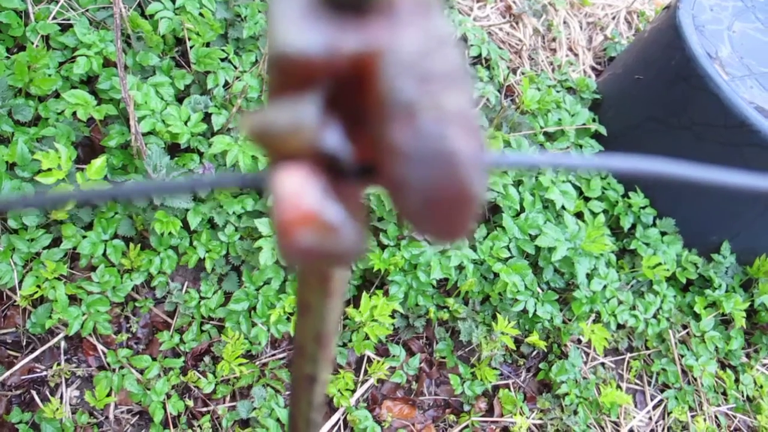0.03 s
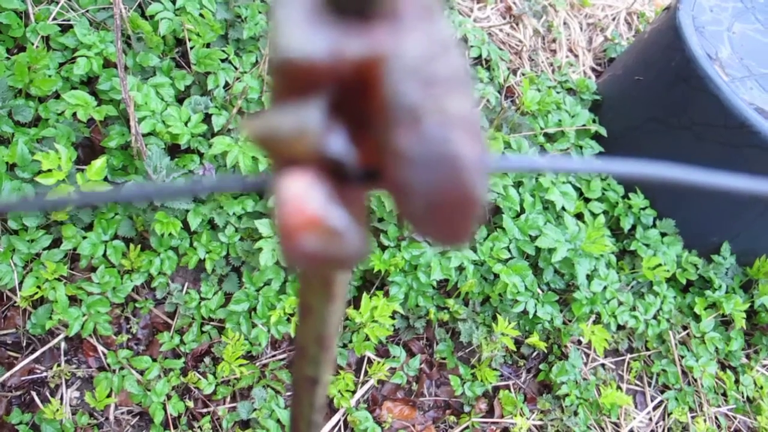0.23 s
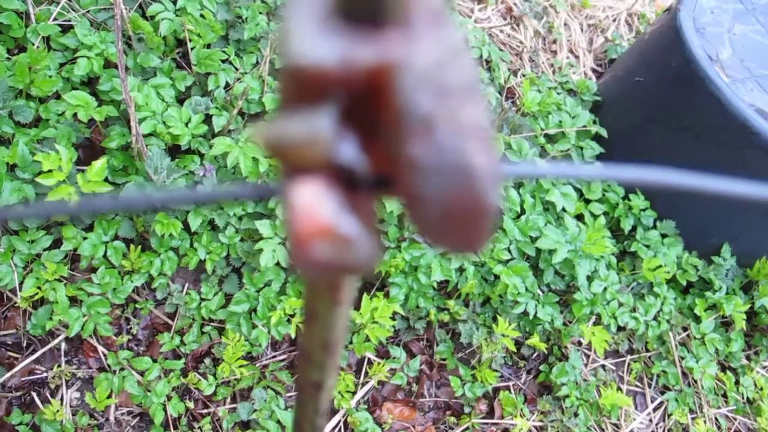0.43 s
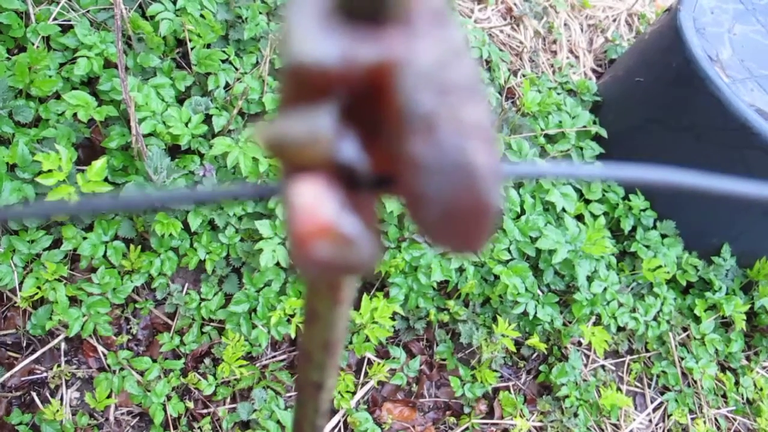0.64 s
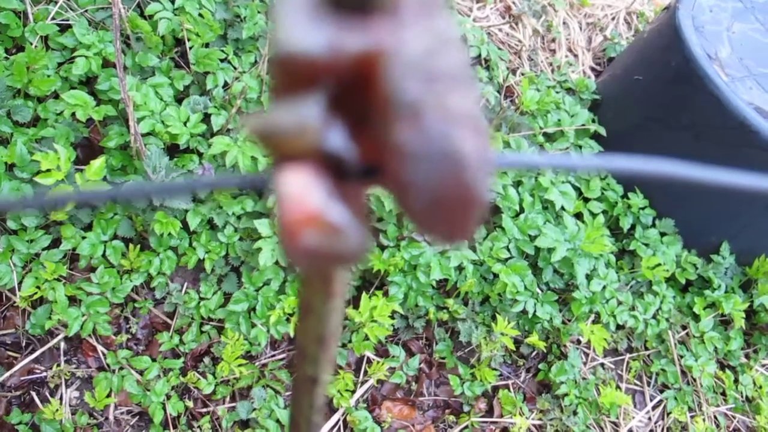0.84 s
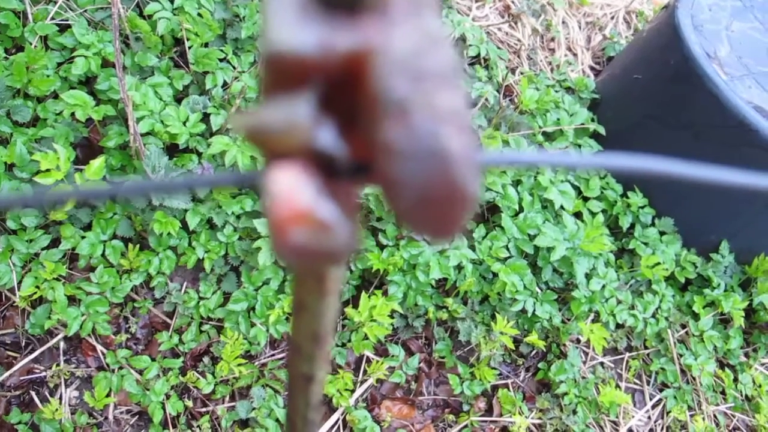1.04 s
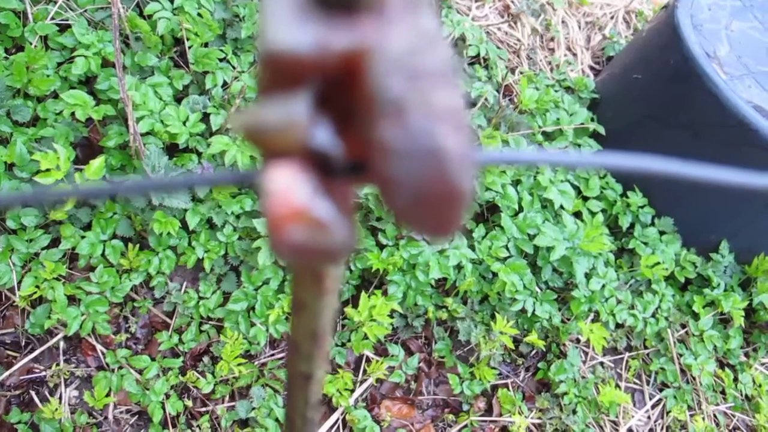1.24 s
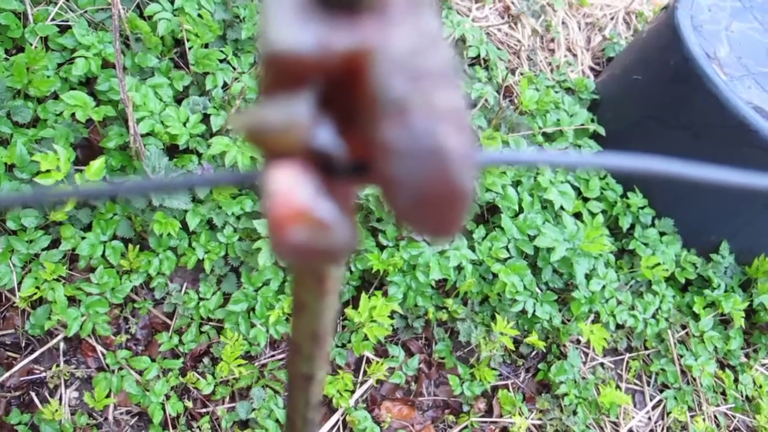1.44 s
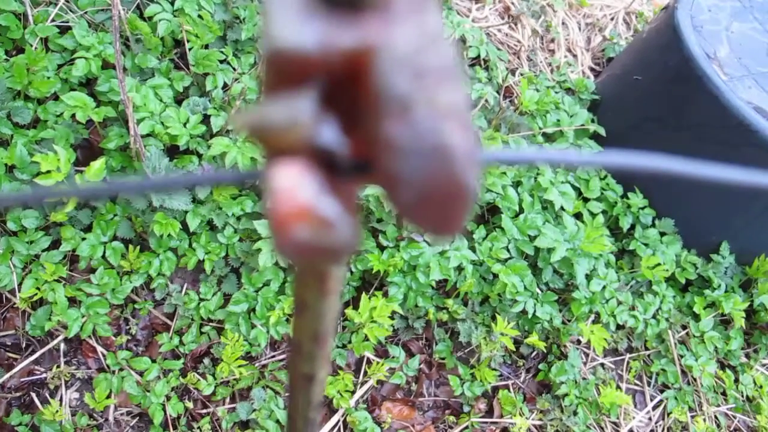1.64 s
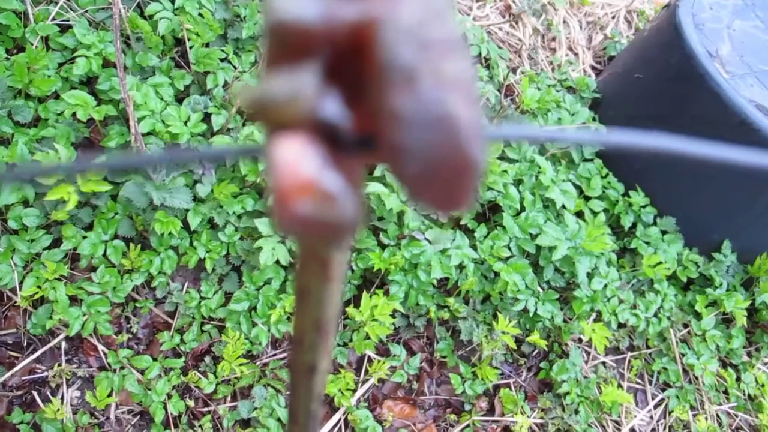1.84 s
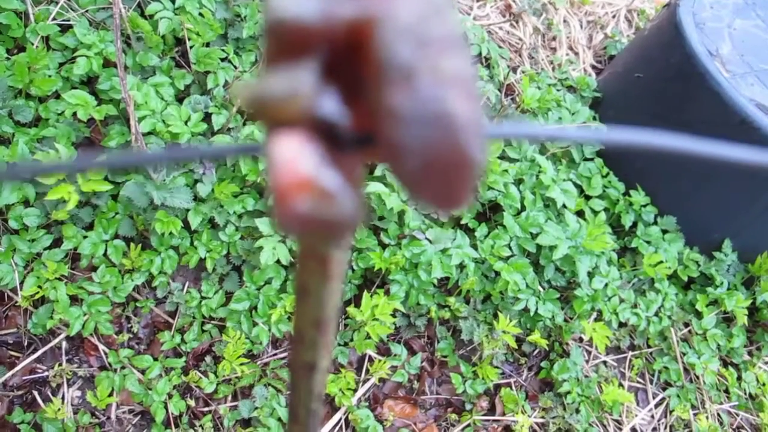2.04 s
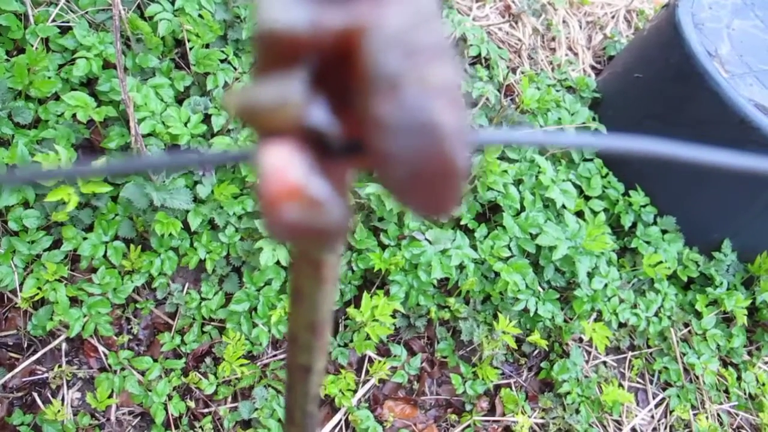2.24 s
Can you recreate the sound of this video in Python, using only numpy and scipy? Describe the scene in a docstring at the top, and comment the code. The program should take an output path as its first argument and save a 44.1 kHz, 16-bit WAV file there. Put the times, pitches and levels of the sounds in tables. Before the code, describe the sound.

An electric fence sparks with two sharp snaps while birds chirp faintly.

```python
"""A wooded garden, the microphone a hand's length from an insulator of an electric fence.
A near bird whistles rising calls over a faint outdoor rush. At 0.25 s a spark snaps: it rings and
overloads the microphone, bounces off the ground and scatters in the foliage; the gain control ducks
and creeps back. Distant song, a faint tick and a soft bump of handling follow. At 1.43 s the fence
sparks again, then come falling chips, a far trill and more song from the trees."""
import sys
import numpy as np
from scipy import signal
from scipy.fft import rfft, irfft
from scipy.io import wavfile
from scipy.ndimage import uniform_filter1d

SR = 44100
rng = np.random.default_rng(int(sys.argv[2]) if len(sys.argv) > 2 else 0)


def generate_wav(signal):
    """Clip the signal to [-1, 1] and save it as 16-bit WAV at the path in sys.argv[1]."""
    frames = np.transpose(np.atleast_2d(signal))
    scaled = np.clip(frames, -1, 1) * 32767
    pcm = np.round(scaled).astype(np.int16)
    wavfile.write(sys.argv[1], SR, pcm)


N = 105840

# sparks, their rebound off the insulator and the overload they leave (signed pressure):
# start_s, level_db, pulse_ms, rebound_ms, rebound_db, left_offset, right_offset
SPARKS = [(0.2482, 28, 0.18, .29, -14, -0.94, -.1), (1.4278, 28.5, 0.093, 0.082, -11.5, -0.67, 0.072)]
# resonances of the microphone housing: pitch_hz, width_hz, left_db, right_db
HOUSING_MODES = [(653, 680, -8.5, -17), (1439, 630, -3, -18), (2360, 810, -0.5, -12), (3232, 280, -5.5, -6),
                 (5300, 240, 1, -16), (7100, 1100, -0.5, -1.5), (7250, 600, -18, 3),
                 (9180, 590, -18.5, -10), (10800, 760, -11.5, -10), (15050, 1600, -6.5, -8.5)]
# echoes off post, ground, plants and far objects: delay_s, spread_s, left_db, right_db
ECHOES = [(.0021, .0004, -24, -24.5), (.006, 0.0003, -28.5, -13.5), (.009, .0018, -23, -21),
          (.059, .0006, -40, -44.5), (.086, .001, -45, -47.5)]
# colour of those echoes: frequency_hz, level_db
ECHO_COLOUR = [(150, -32.5), (600, -21), (2300, -15), (4500, -22), (6000, -6), (7000, -4), (9000, -11),
               (12000, -19.5), (16000, -34.5)]
# scatter from near and far foliage: t60_s, left_db, right_db
LEAF_SCATTER = [(.06, -31, -30), (0.322, -40, -28)]
# colour of that scatter: frequency_hz, level_db
LEAF_COLOUR = [(200, -34.5), (1800, -15.5), (4200, -13.5), (6000, -5), (7500, -1.5), (10500, -11),
               (13000, -22.5), (16000, -34.5)]
# rising calls of the near bird: start_s, level_db
NEAR_CALLS = [(-.1, -35.5), (.029, -39), (0.161, -40)]
# distant song: start_s, length_s, from_hz, to_hz, bend (under 1 glides early), level_db
SONG_NOTES = [(.38, 0.041, 6500, 5400, 0.43, -54), (.41, 0.028, 4620, 3700, 0.46, -59.5),
              (.694, 0.016, 6890, 4320, 0.64, -54), (.704, 0.028, 4400, 4040, 0.72, -50),
              (1.034, 0.039, 7350, 5185, 0.3, -52), (1.052, 0.025, 6220, 5100, 1.0, -54.5),
              (1.064, 0.037, 5000, 3500, 0.44, -58), (1.495, 0.096, 2970, 4335, 1.3, -55),
              (2.21, .07, 5415, 5200, 1.0, -62.5), (2.255, 0.051, 4430, 4450, 0.85, -60.5),
              (2.32, 0.038, 5030, 5550, 1.36, -56), (2.35, 0.053, 4740, 4500, 0.67, -55.5),
              (2.37, 0.037, 5430, 5250, 1.3, -56.5)]
# a run of falling chips: start_s, level_db
CHIPS = [(1.683, -57), (1.751, -57), (1.821, -57), (1.893, -53), (1.97, -53), (2.041, -54), (2.123, -56)]
# handling noises at the microphone: start_s, length_s, centre_hz, width_hz, level_db
HANDLING = [(0.626, 0.012, 2540, 2600, -56), (1.066, 0.029, 136, 68.6, -49)]
# spectrum of the outdoor rush: frequency_hz, density_db
AIR_COLOUR = [(15, -29.5), (25, -3), (74, 3), (123, -7), (293, -15), (373, -16.5), (607, -11.5),
              (1190, -14.5), (1940, -21.5), (2610, -20.5), (2990, -21.5), (5430, -24), (6560, -25.5),
              (14000, -32.5), (16000, -49)]
# share of the rush that differs between left and right: frequency_hz, side_db
AIR_SIDE = [(50, -16.5), (200, -5), (900, -6.5), (4000, 0.5), (12000, -1)]


def fence():
    """One snap for each pulse of the fence; the overloaded microphone settles with a small thump."""
    out = np.zeros((2, LEAD + N))
    thump_s = .0009
    settle = np.exp(-np.arange(SR // 20) / SR / thump_s)
    for start, db, pulse_ms, rebound_ms, rebound_db, left, right in SPARKS:
        add(out, start, undb(db) * spark(pulse_ms, rebound_ms, rebound_db))
        add(out, start, np.array([[left], [right]]) * settle)
        add(out, start, undb(db) * garden_reflections())
    return out[:, LEAD:]


def spark(pulse_ms, rebound_ms, rebound_db):
    """A pressure pulse and its rebound off the insulator, heard through the ringing housing."""
    size = 4096
    t, hz = np.arange(size) / SR, np.fft.rfftfreq(size, 1 / SR)
    age = t * 1000 / pulse_ms
    pulse = -np.exp(-2 * age) * (1 - age)
    rebound = 1 + undb(rebound_db) * np.exp(-2j * np.pi * hz * rebound_ms / 1000)
    crack = irfft(rfft(pulse) * rebound)[:size // 2]
    power = undb(-13.5) ** 2  # flat floor under the resonances
    for pitch, width, left, right in HOUSING_MODES:
        resonance = (width * hz) ** 2 / ((width * hz) ** 2 + (pitch ** 2 - hz ** 2) ** 2)
        power = power + undb([[left], [right]]) ** 2 * resonance
    ring = causal(2 * np.sqrt(power))
    return signal.fftconvolve(crack[None], ring, axes=1)


def garden_reflections():
    """What comes back of a snap: a few echoes and a hiss of reflections from leaves."""
    t = np.arange(SR // 2) / SR
    echoes = leaves = 0
    for delay, spread, left, right in ECHOES:
        age = np.maximum(t - delay + spread, 0) / spread
        burst = rng.standard_normal((2, len(t))) * age ** 2 * np.exp(-2 * age)
        echoes += undb([[left], [right]]) * unit(colour(burst, ECHO_COLOUR))
    ground_delay_s = ECHOES[1][0]
    arrived = np.clip(t / ground_delay_s - 1, 0, 1)
    for t60, left, right in LEAF_SCATTER:
        hiss = rng.standard_normal((2, len(t))) * arrived * decay(t, t60)
        leaves += undb([[left], [right]]) * unit(hiss)
    return echoes + colour(leaves, LEAF_COLOUR)


def birds():
    """A near caller, distant song, chips and a far trill that is mostly reverberation."""
    # rows laid out like SONG_NOTES
    calls = [(start, .048, 4150, 7143, 2.2, db) for start, db in NEAR_CALLS]
    chips = [(start, .02, 3750, 2450, 1, db) for start, db in CHIPS]
    step_s, fall_db_per_s = .074, 1
    trill = [(1.835 + s, .065, 6400, 3840, .5, -71.5 - fall_db_per_s * s) for s in step_s * np.arange(8)]
    chorus = (among_trees(whistles(calls, rough=.014), wet_db=7.5)
              + among_trees(whistles(SONG_NOTES, rough=.022), wet_db=5)
              + among_trees(whistles(chips, rough=.015), wet_db=-4)
              + among_trees(whistles(trill, rough=.0994), wet_db=21))
    return chorus[:, LEAD:] * undb([[1], [-1]])  # a little left of the microphone


def whistles(notes, rough):
    """A bird's gliding notes; the pitch wavers by the fraction rough."""
    out = np.zeros(LEAD + N)
    for start, length, from_hz, to_hz, bend, db in notes:
        progress = np.linspace(0, 1, int(length * SR))
        glide = progress ** bend if bend >= 1 else 1 - (1 - progress) ** (1 / bend)
        waver = uniform_filter1d(rng.standard_normal(SR // 4), size=64)[:len(progress)] * np.sqrt(64)
        hz = (from_hz + (to_hz - from_hz) * glide) * (1 + rough * waver)
        tone = np.sin(2 * np.pi * np.cumsum(hz) / SR)
        add(out, start, undb(db) * np.sin(np.pi * progress) * tone)
    return out


def among_trees(direct, wet_db):
    """The trees add a long tail and a short, stronger scatter to the direct sound."""
    t = np.arange(SR) / SR
    tail = decay(t, t60_s=1) + undb(3.5) * decay(t, t60_s=.15)
    trees = unit(rng.standard_normal((2, SR)) * tail)
    wet = signal.fftconvolve(direct[None], trees, axes=1)[:, :len(direct)]
    return direct + undb(wet_db) * wet


def handling():
    """A faint tick and a soft low bump close to the microphone."""
    out = np.zeros(LEAD + N)
    hz = np.fft.rfftfreq(SR, 1 / SR)
    for start, length, centre, width, db in HANDLING:
        passband = np.exp(-2 * ((hz - centre) / width) ** 2)
        noise = irfft(rfft(rng.standard_normal(SR)) * passband, SR)
        swell = np.hanning(int(length * SR))
        add(out, start, undb(db) * swell * noise[:len(swell)] / np.std(noise))
    return out[LEAD:]


def air(mid_db=-57.5):
    """Faint outdoor rush, its rumble near the centre and its treble wide."""
    hz = np.fft.rfftfreq(N, 1 / SR)
    mid, side = rfft(rng.standard_normal((2, N))) * curve(AIR_COLOUR, hz)
    mid, side = irfft(mid, N), irfft(side * curve(AIR_SIDE, hz), N)
    return np.array([mid + side, mid - side]) * undb(mid_db) / np.std(mid)


def add(out, start_s, x):
    """Mix x into a track that begins LEAD samples before time zero."""
    i = max(LEAD + int(round(start_s * SR)), 0)
    part = x[..., :max(out.shape[-1] - i, 0)]
    out[..., i:i + part.shape[-1]] += part


def undb(db):
    """Decibels to gain."""
    return 10 ** (np.asarray(db) / 20)


def decay(t, t60_s):
    """An envelope that falls 60 dB in t60_s."""
    return np.exp(-np.log(1000) * t / t60_s)


def unit(x):
    """Scale each channel to unit energy."""
    return x / np.sqrt(np.sum(x ** 2, axis=-1, keepdims=True))


def curve(points, hz):
    """Gain at hz from (frequency_hz, level_db) points."""
    point_hz, point_db = np.array(points, float).T
    return undb(np.interp(np.log(hz + 1), np.log(point_hz), point_db))


def colour(x, points):
    """Pass x through a causal, unit-energy filter of the given colour."""
    response = causal(curve(points, np.fft.rfftfreq(2048, 1 / SR)))
    return signal.fftconvolve(x, unit(response)[None], axes=1)[:, :x.shape[1]]


def causal(gain):
    """Shortest causal response with the given gains."""
    cepstrum = irfft(np.log(gain))
    half = cepstrum.shape[-1] // 2
    cepstrum[..., 1:half] *= 2
    cepstrum[..., half + 1:] = 0
    return irfft(np.exp(rfft(cepstrum)))[..., :half]


LEAD = SR // 4  # samples of run-up, so an earlier call can still be ringing at time zero


def scene():
    """The garden at the microphone: fence, birds, outdoor air and handling."""
    return fence() + birds() + air() + handling()


def record(dry):
    """The recorder's gain control ducks on loud peaks, holds and creeps back; the snaps still overload."""
    threshold_db, max_duck_db, hold_s, recover_s = -14, 13, .04, .46
    ceiling, top_hz = .8, 16000
    peak_db = 20 * np.log10(np.abs(dry).max(axis=0) + 1e-9)
    over_db = np.clip(peak_db - threshold_db, 0, max_duck_db)
    fade = np.exp(-np.arange(N) / SR / recover_s)
    recovering_db = np.maximum.accumulate(over_db / fade) * fade
    duck_db = np.minimum(recovering_db * np.exp(hold_s / recover_s), max_duck_db)  # the cap is the hold
    ducked = dry * undb(-duck_db)
    clipped = ducked / np.sqrt(np.hypot(1, (ducked / ceiling) ** 2))
    lowpass = signal.ellip(8, .2, 70, top_hz, fs=SR, output="sos")
    return signal.sosfilt(lowpass, clipped)


dry = scene()
out = record(dry)
generate_wav(out)
```